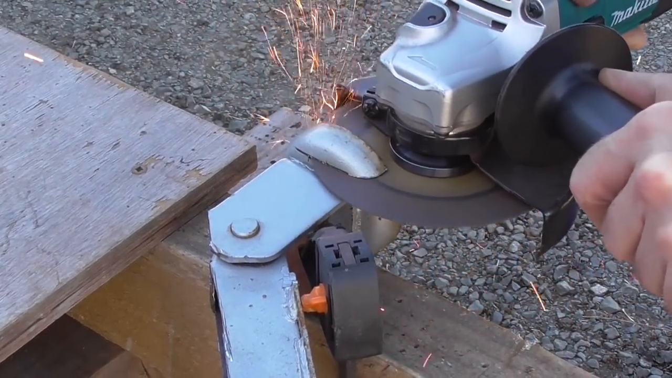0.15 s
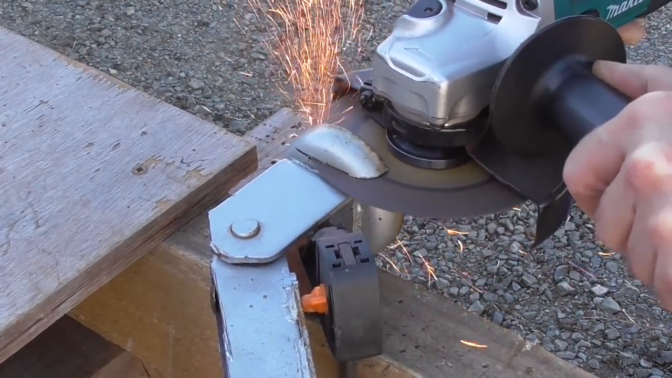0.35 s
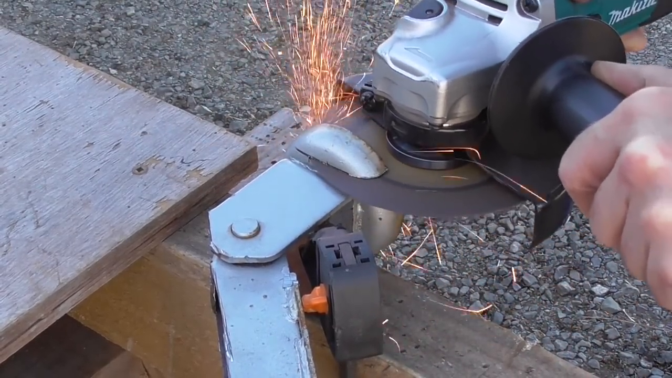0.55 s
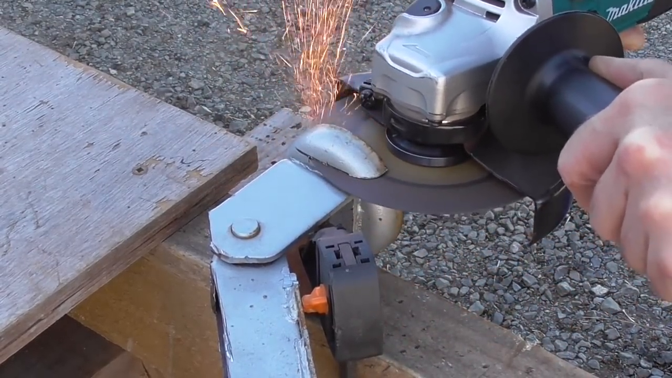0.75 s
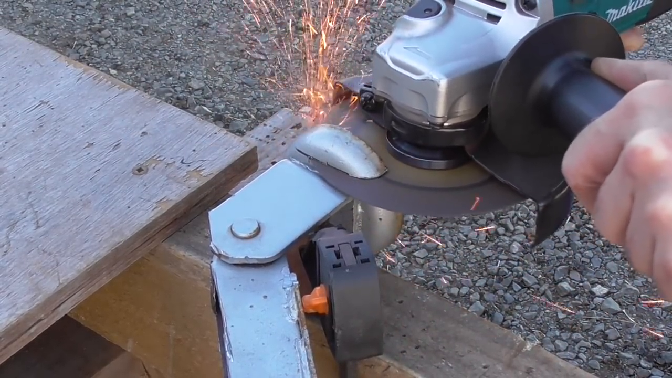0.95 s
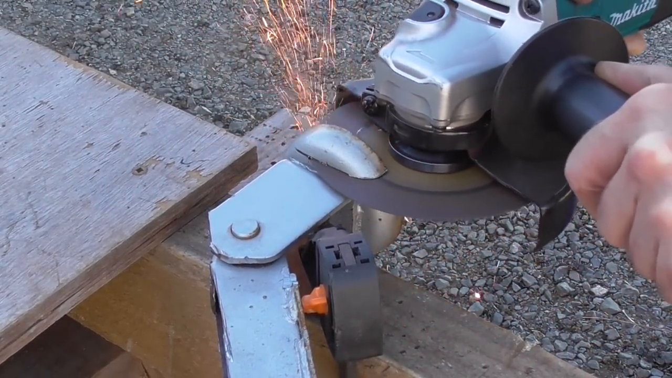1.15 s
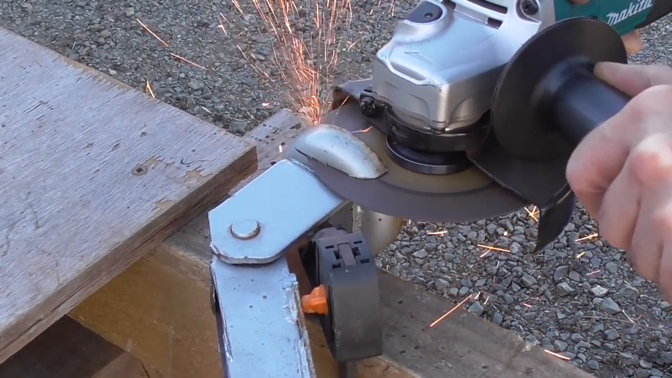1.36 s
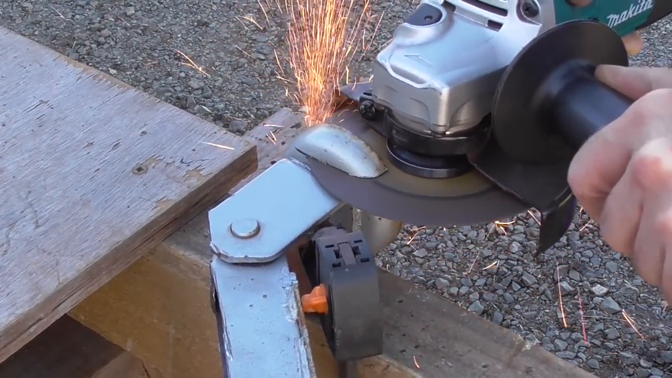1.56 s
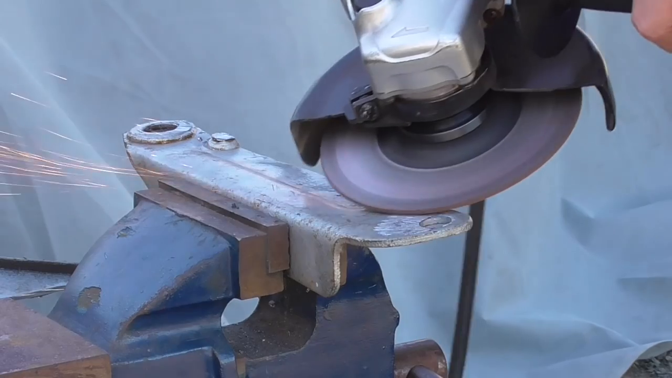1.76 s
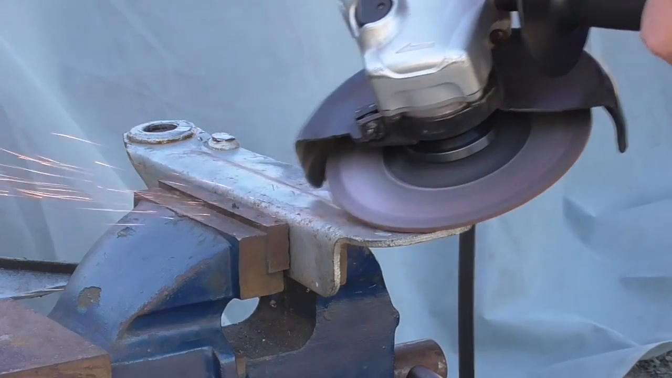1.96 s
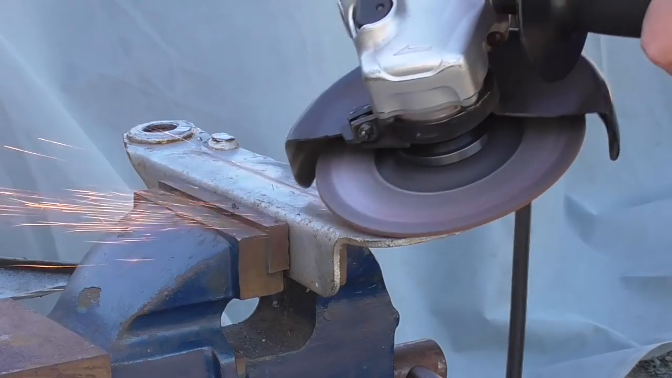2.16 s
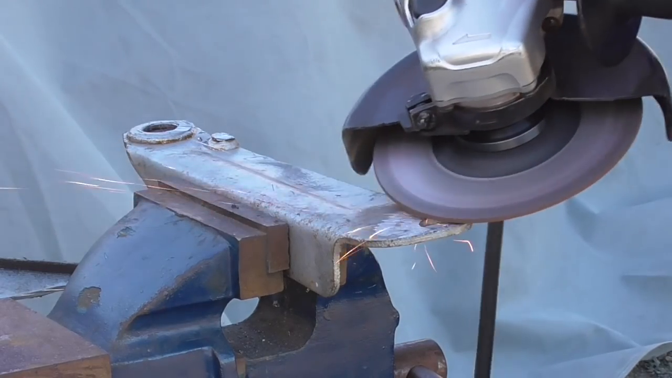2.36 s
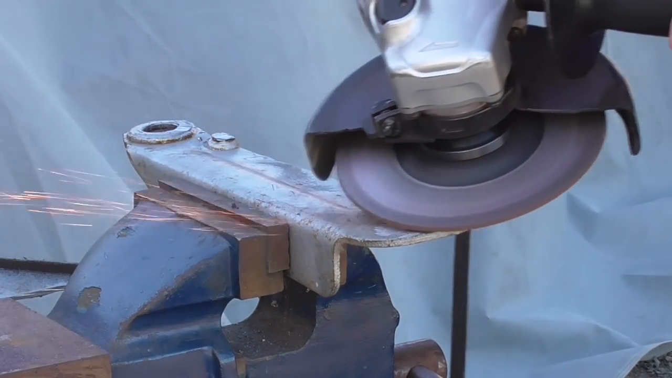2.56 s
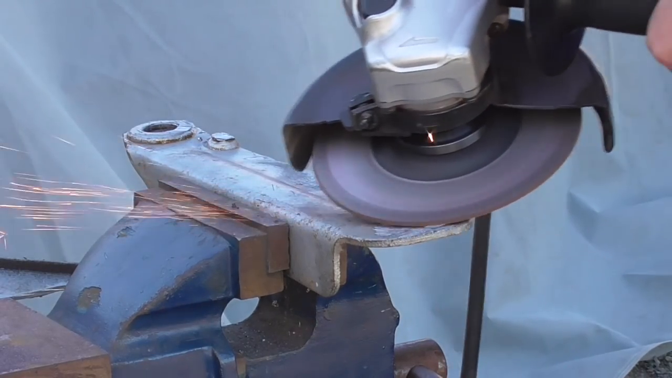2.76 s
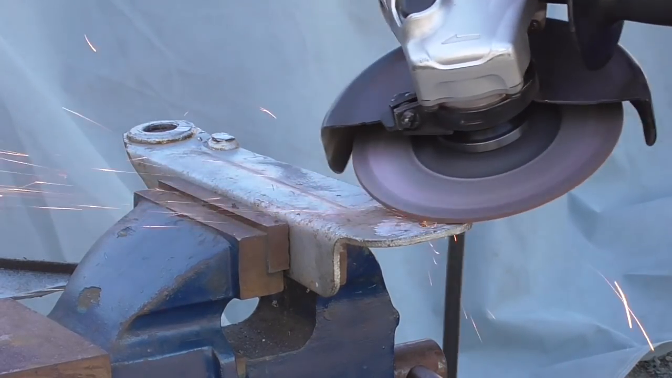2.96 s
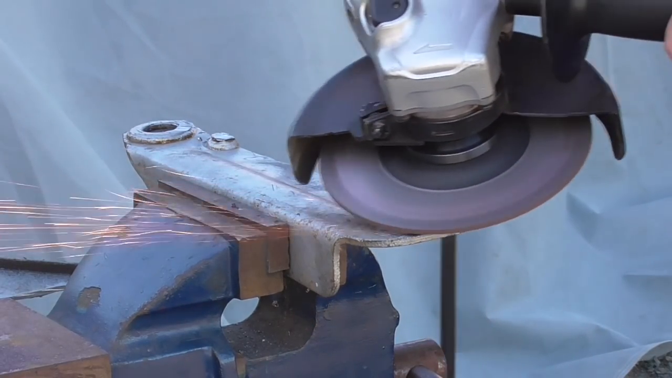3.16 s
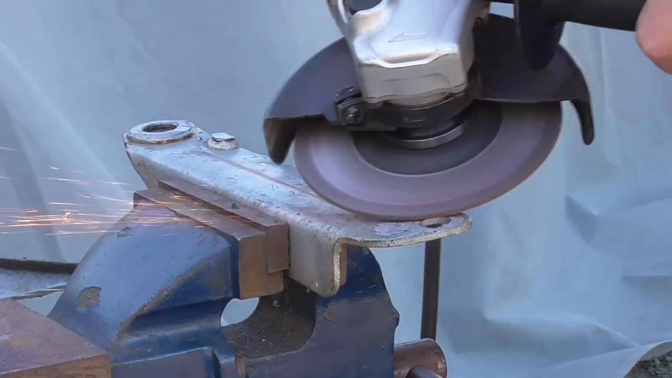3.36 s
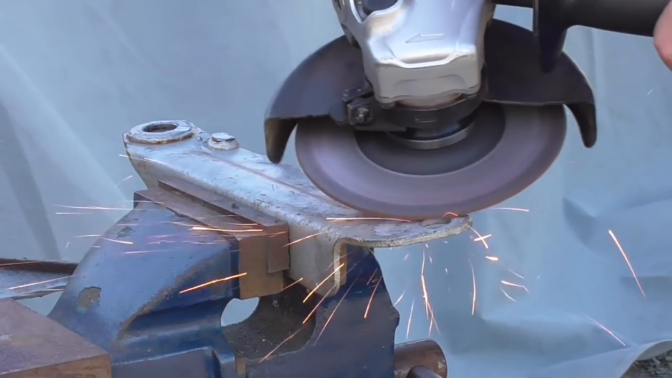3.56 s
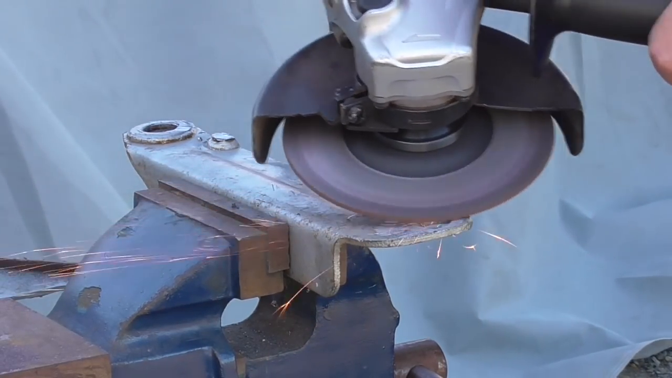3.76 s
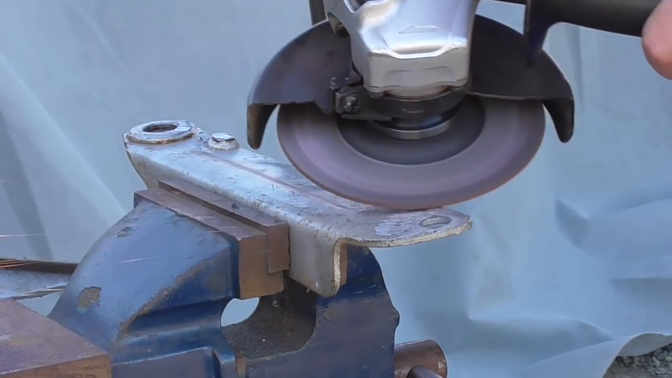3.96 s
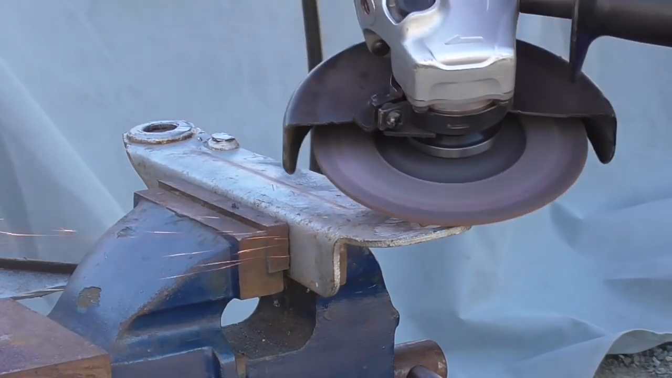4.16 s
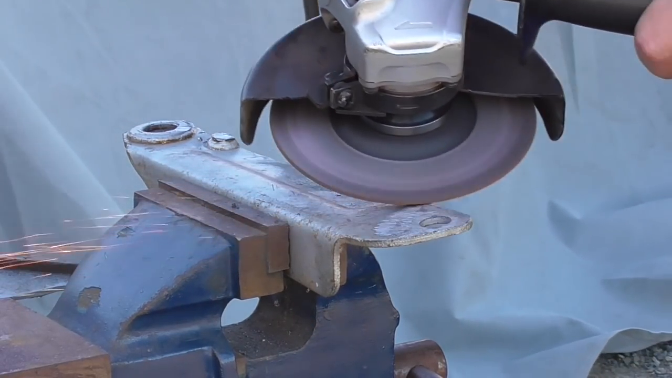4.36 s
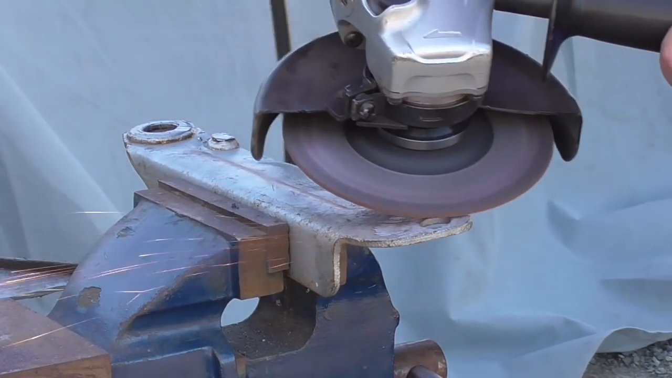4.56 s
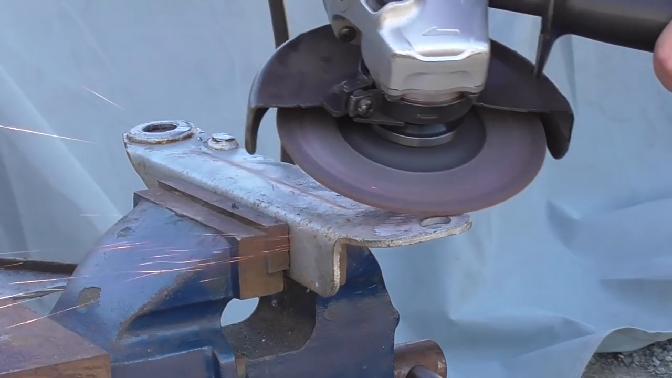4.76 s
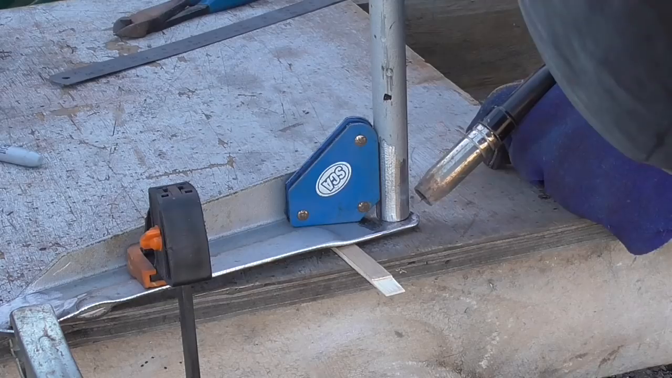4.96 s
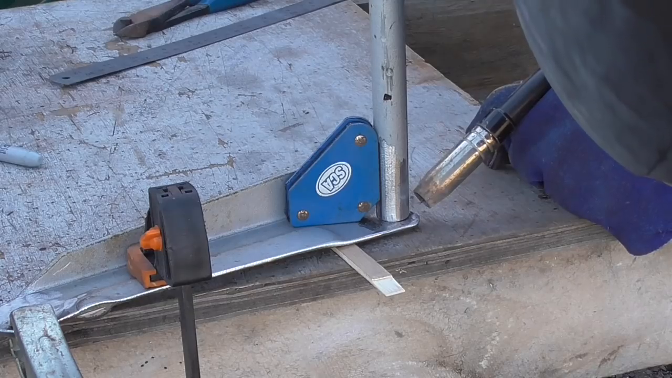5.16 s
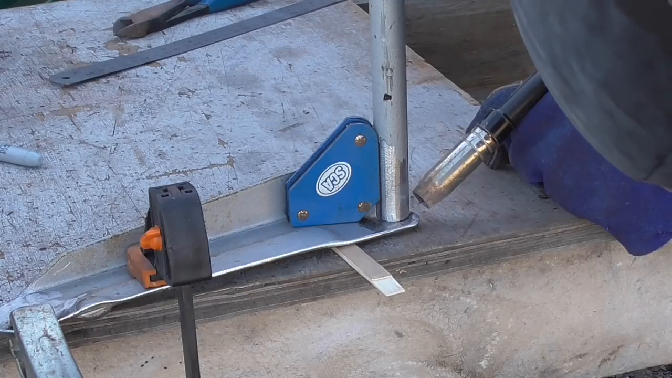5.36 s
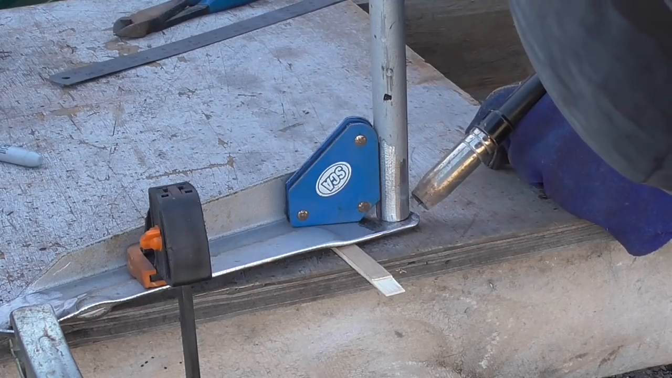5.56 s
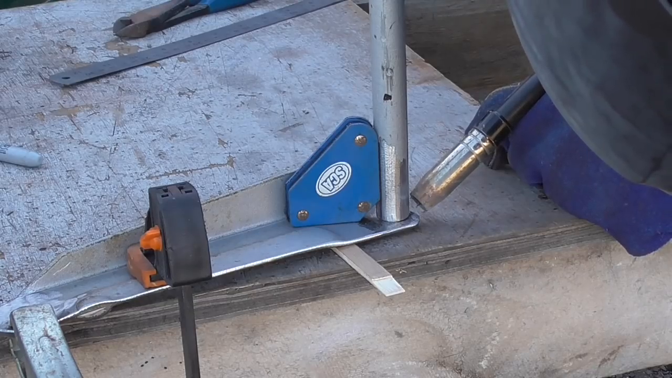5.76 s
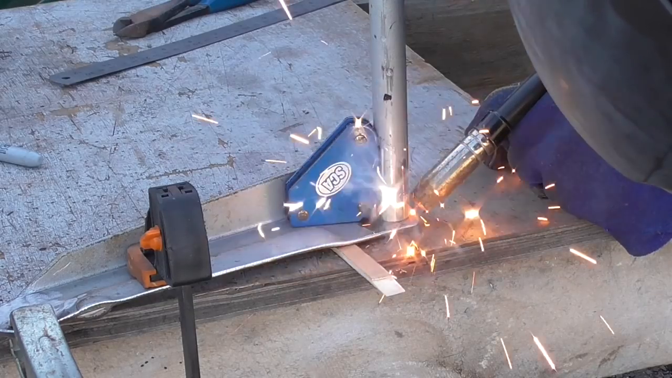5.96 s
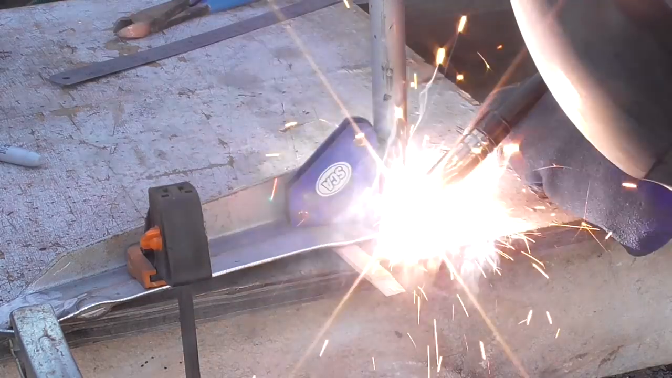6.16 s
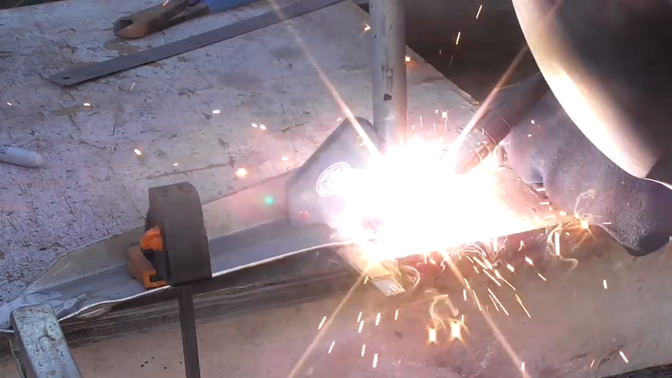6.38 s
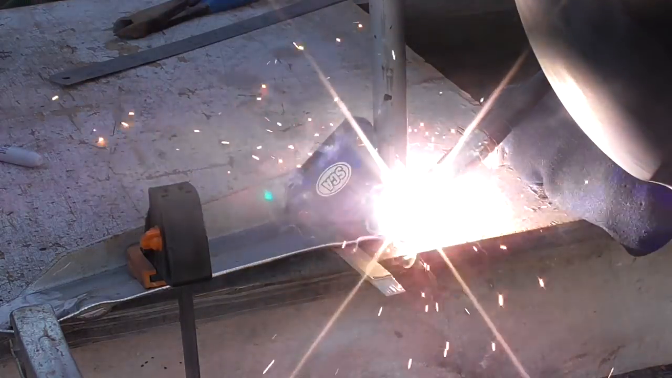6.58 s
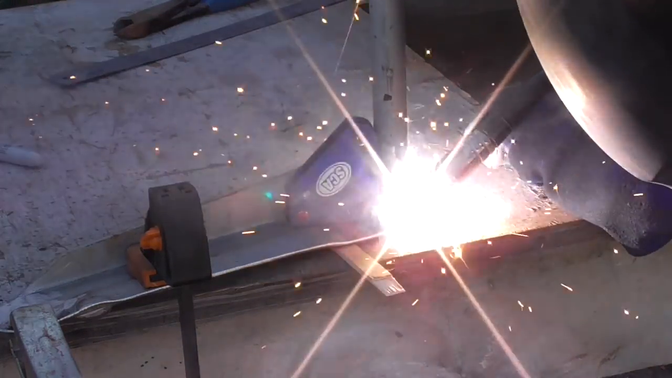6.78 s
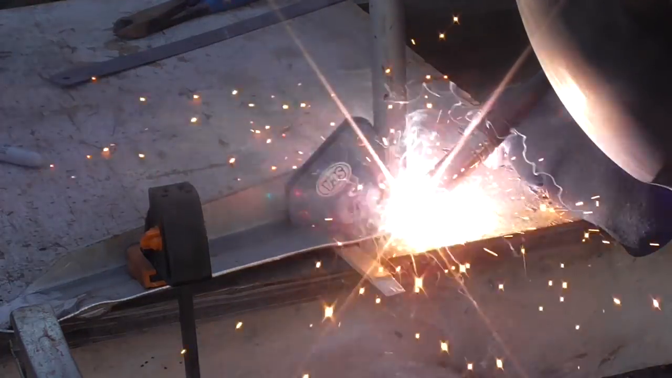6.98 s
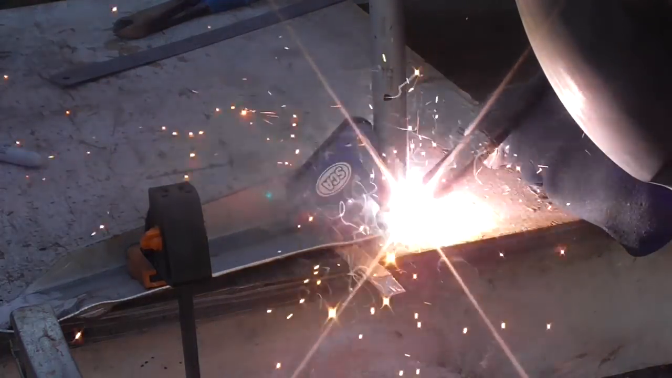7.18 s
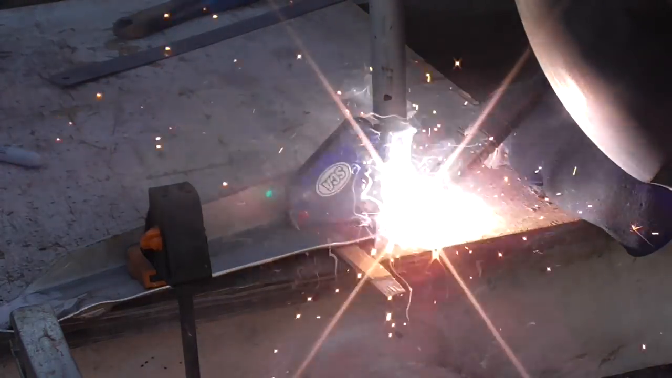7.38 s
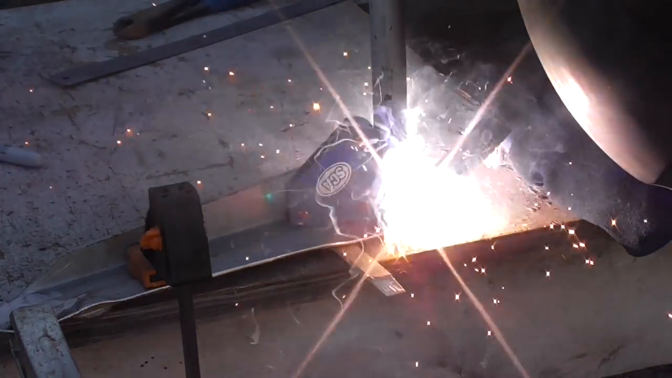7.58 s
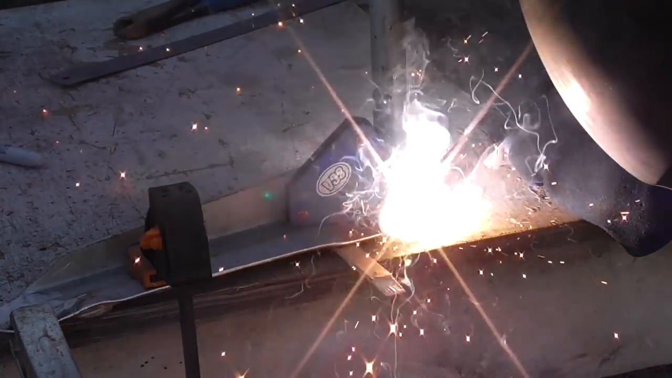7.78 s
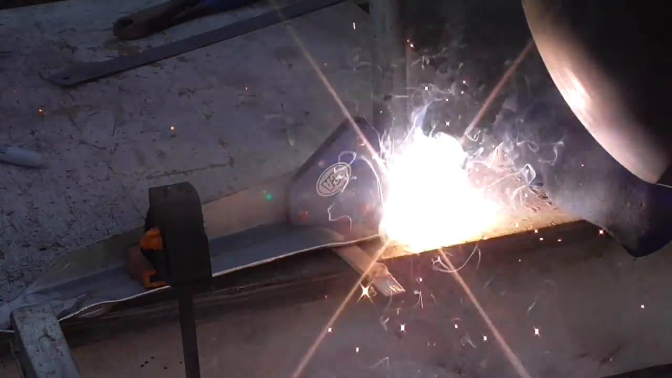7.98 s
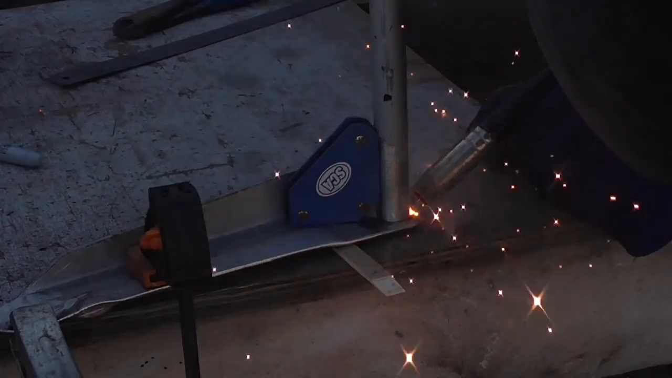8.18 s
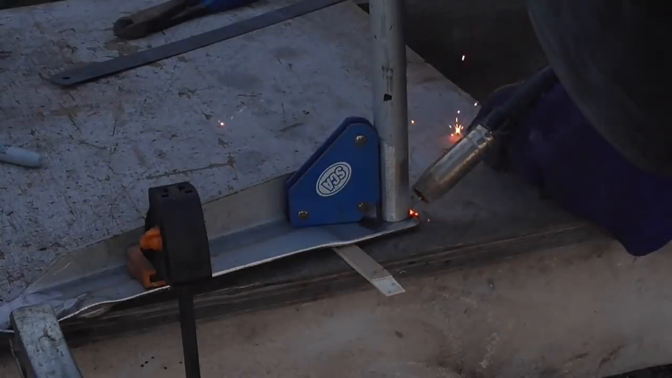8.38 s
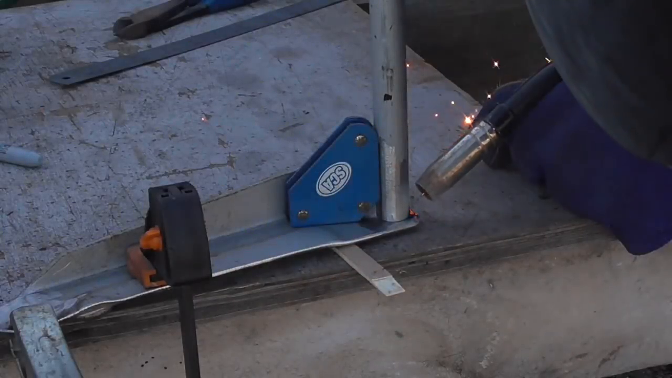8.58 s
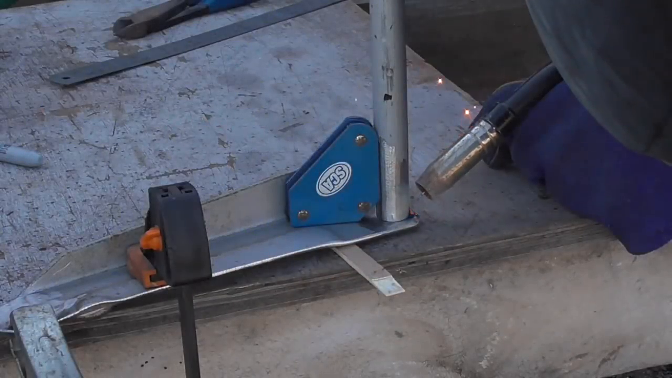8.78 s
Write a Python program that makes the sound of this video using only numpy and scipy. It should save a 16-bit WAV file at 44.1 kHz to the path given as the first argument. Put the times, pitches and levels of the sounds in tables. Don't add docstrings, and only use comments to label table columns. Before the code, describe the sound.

Stereo microphones near the work, outdoors and dry. First a steady, gritty cutting rasp surges as the disc bites. An abrupt jump brings rougher grinding that flutters and hops with each turn, setting off metallic squeals stroke after stroke. Another jump drops to quiet fan hum, low wind thumps and distant birds, then a contactor clunk, hard wire snaps and a buzzing, spitting weld. It breaks off and the yard hum slowly returns.

```python
import sys
import numpy as np
from scipy import signal
from scipy.fft import rfft, irfft
from scipy.io import wavfile
from scipy.ndimage import uniform_filter1d

SR = 44100
rng = np.random.default_rng(int(sys.argv[2]) if len(sys.argv) > 2 else 0)


def ratio(d):
    e = np.asarray(d, float) / 20
    return 10 ** e


def to_wav(s):
    ch = np.atleast_2d(s).T
    pcm = np.round(np.clip(ch, -1, 1) * 32767)
    wavfile.write(sys.argv[1], SR, pcm.astype(np.int16))


N = 389403
T = np.arange(N) / SR

SCENE_CHANGES = (1.65, 4.948)

# (time [s], shaft speed [Hz])
CUT_SHAFT = [(0.04, 126.7), (0.2, 123.6), (0.36, 131.8), (0.54, 126.6), (0.92, 133.6), (1.16, 126.6),
             (1.32, 130.8), (1.48, 126.5), (1.58, 123.5)]
# (time [s], length [s], whine boost [dB])
CUT_BITES = [
    (.15, 0.12, 9),
    (.38, 0.26, 8),
    (.65, 0.17, 9.5),
    (.9, 0.51, 4),
    (1.11, 0.23, 6),
    (1.33, 0.097, 11),
    (1.54, 0.25, 10),
]
# (frequency [Hz], level [dB per Hz])
CUT_RASP = [(88, -50), (150, -19), (432, -17), (615, -12), (928, -12.5), (1540, -5), (1770, -16),
            (2200, -12.5), (2470, -18.5), (2950, -10.5), (4530, 0), (5520, -6.5), (11200, -5.5),
            (15300, -17), (16200, -17)]
# (frequency [Hz], width [Hz], level [dB])
CUT_RINGS = [(4620, 64, -15), (8160, 340, -14), (8900, 130, -12), (9930, 60, -12), (10880, 45, -14)]
# (shaft multiple [1], level over the whine [dB])
CUT_WHINE = [(11, -10), (12, 0), (33, -9), (35, 0), (36, -3.5)]
# (time [s], length [s], level [dB])
BAR_SQUEAKS = [
    (.55, .1, -57),
    (1.07, .2, -58),
    (1.22, .08, -60),
    (1.42, .2, -58),
]

CALM_WIND = (-70, -91, -70)
# (time [s], length [s], level [dB])
GUSTS = [(0.035, 0.17, -66), (0.572, 0.52, -57), (1.106, 0.3, -64), (1.402, 0.36, -56), (1.897, 0.9, -73),
         (1.796, 0.16, -66), (2.255, 0.59, -65.5), (2.59, 0.73, -75), (3.097, 1.3, -73), (4.184, 0.11, -70),
         (4.33, 0.092, -68), (4.602, 0.73, -81), (4.98, .07, -43), (5.03, .16, -40), (5.222, 0.24, -40.5),
         (5.42, 0.35, -59), (5.69, 0.52, -42), (5.905, 0.34, -43), (6.376, 0.24, -48.5), (6.84, 0.4, -53),
         (6.66, .15, -56), (7.3, .6, -71), (7.746, 0.67, -65)]
# (frequency [Hz], level [dB per Hz])
WIND_COLOUR = [(12, -37), (20, -23), (59, -4.5), (129, 0), (187, -4.5), (245, -6.5), (386, -21), (600, -28),
               (780, -69), (1320, -120)]

# (time [s], shaft speed [Hz])
GRIND_SHAFT = [(1.75, 154.5), (2.05, 153.8), (2.35, 153.2), (2.5, 154.8), (3.25, 153.9), (3.7, 154.1),
               (3.85, 154.8), (4.3, 155.4), (4.8, 156.1)]
# (time [s], pressure [dB], hop [0-1])
PRESS = [
    (1.65, -34, 0.2),
    (1.69, -46, 0.5),
    (1.79, -35.5, 1),
    (2.3, -34, 0.73),
    (2.48, -34, 0.35),
    (3.4, -33, 0.58),
    (3.75, -33.5, 0.05),
    (4.3, -35.5, 0),
    (4.95, -34.5, 0),
]
# (time [s], length [s], change [dB])
LIFTS = [(2.83, 0.079, -6.5), (3.15, 0.055, -4), (3.5, .08, -3), (3.84, 0.088, -1.5), (4.02, 0.063, -2),
         (4.2, 0.081, 1), (4, 0.047, -6), (4.66, 0.072, -0.5), (2.63, 0.051, -6.5), (2.45, .04, -2),
         (1.657, .012, 1), (2, 0.027, -3)]
# (frequency [Hz], width [Hz], level [dB])
BRACKET_RINGS = [
    [(6448, 150, -0.5), (6407, 27, -15), (5500, 33, -17), (4200, 45, -13)],
    [(6370, 92, -17)],
    [(7410, 74, -6.5), (11050, 86, -14), (10300, 370, -8), (13000, 170, -16)],
    [(9100, 110, 4.5), (12100, 100, -5), (12900, 160, -13)],
    [(4200, 45, -3)],
    [(7080, 180, -1), (8100, 250, -3)],
    [(2320, 93, -6.5)],
    [(10050, 190, 3), (13050, 200, -16), (11050, 100, -13)],
]
# (frequency [Hz], level [dB])
BRACKET_SQUEALS = [
    [(6470, -8)],
    [(5233, -2)],
    [(7460, -1.5)],
    [(8945, 4.5)],
    [(4180, 5)],
    [(6955, -6)],
    [],
    [],
]
SQUEAL_THROB = [0.63, 0.18, 0.68, 0.25, 0.22, 0.56, .5, .5]
DRIVE_REST = [-0.5, -27, -13, -13, -17, -16, -30, -13]
# (time [s], length [s], lip boost [dB], edge boost [dB], hub boost [dB])
TIP_STROKES = [(1.8, .14, -3, -1, 7.5), (1.96, .16, 7, -12, 10), (2.13, 0.18, 0, 2.5, -1),
               (2.35, 0.25, 28.5, 1, 6.5), (2.68, 0.12, 23, 9.5, 9.5), (3.01, 0.14, 25, 9, 8.5),
               (3.28, .17, 30, 8, 11), (3.6, 0.18, 21, 3.5, 6), (3.95, 0.19, 12, 4, 7),
               (4.3, 0.14, 0, 10, 10.5), (4.83, 0.19, 0, 4, -1), (2.57, .09, 0, 8, 5), (2.9, .08, 0, -1, 7),
               (4.5, .14, 0, 0, 1), (3.36, 0.09, 2, 4.5, 0)]
# (time [s], length [s], web boost [dB], rim boost [dB])
VICE_STROKES = [(1.8, .12, 0, 5), (2.3, .15, 11, 12), (2.51, 0.23, 3, 14), (2.74, 0.18, 7, 15.5),
                (2.91, 0.089, 9, -2), (3.08, 0.23, 1, 14.5), (3.55, .3, 7, 6), (3.9, 0.4, 11, 8),
                (4.14, 0.25, 20, 9), (4.3, 0.16, 11.5, 3), (4.5, 0.41, 16.5, 4), (4.8, 0.25, 16, 8),
                (4.92, .12, 9, 0)]
# (time [s], length [s], face boost [dB])
FACE_STROKES = [(1.9, .2, 4), (2.25, .15, 4), (2.54, .16, 8), (2.71, .16, 7), (2.93, .1, 5), (3.1, .26, 8),
                (3.32, .22, 8), (3.6, .2, 5), (3.95, .16, 6), (4.16, .16, 7), (4.32, .1, 3), (4.5, .16, 6),
                (4.87, .24, 8)]
# (frequency [Hz], level [dB per Hz])
GRIND_AIR = [(88, -36), (150, -29), (260, -24), (390, -24), (520, -20), (860, -19), (980, -24), (1100, -16),
             (1350, -13.5), (1740, -19), (1990, -14), (2830, -16.5), (4190, -8), (4900, -10.5), (6450, -6),
             (6980, -8.5), (12300, -15.5), (15300, -29), (16200, -71)]
# (shaft multiple [1], level [dB])
MOTOR = [(1.0, -74), (2.0, -72), (3.0, -62), (4.0, -69), (7.5, -67), (12.0, -60)]
# (shaft multiple [1], level at rest [dB])
GEAR = [(13, -61), (16, -59)]
# (time [s], length [s], first tone boost [dB], second tone boost [dB])
GEAR_LOAD = [
    (2.95, .12, 8, 0),
    (3.15, .2, 5, 0),
    (3.95, .28, 8, 3),
    (3.8, .2, 0, 10),
    (4.13, .18, 0, 9),
    (4.5, .25, 0, 11),
    (4.64, 0.27, 14, 5),
    (4.8, .32, 0, 8),
    (4.92, .1, 13, 9),
]
# (time [s], length [s], level [dB])
EARLY_HUM = [
    (2.05, .9, -62),
]

# (frequency [Hz], level [dB])
FAN = [(223, -43), (447, -55.5)]
# (frequency [Hz], level [dB per Hz])
YARD_COLOUR = [(180, -32), (300, -7), (447, -3), (565, -2.5), (856, -5.5), (1410, -10), (1750, -23),
               (4020, -18), (6410, -26), (8360, -7), (9880, -24.5), (14700, -37), (16000, -50)]
# (time [s], length [s], start pitch [Hz], end pitch [Hz], level [dB])
BIRDS = [
    (5.07, 0.068, 4550, 4690, -53),
    (5.1, .04, 4500, 3950, -64),
    (5.44, 0.079, 4440, 3830, -52),
    (5.499, 0.069, 3880, 3620, -53),
    (8.43, 0.045, 4530, 3440, -51),
    (8.495, 0.026, 3560, 3830, -46),
    (8.53, 0.091, 3540, 3600, -54),
    (8.52, 0.058, 4150, 4123, -55),
]
# (time [s], gain [dB])
YARD_GAIN = [
    (4.95, 0.5),
    (5.85, 1),
    (5.96, 3),
    (6.0, -0.5),
    (6.2, -8.5),
    (8.2, -11.5),
    (8.27, -8.5),
    (8.5, -7),
    (8.83, -1),
]

# (time [s], rise [s], hold [s], T60 [s], frequency [Hz], level [dB])
CASE_BOOM = [
    (5.885, 0.013, 0.035, 0.037, 195, -23.5),
    (5.885, 0.03, .01, 0.26, 150, -32),
    (5.88, 0.0064, .002, 0.216, 480, -35),
]
# (time [s], rise [s], fall per 10 dB [s], sputter level [dB])
STRIKE = [
    (5.872, .008, .004, -49),
    (5.883, .003, .009, -34),
    (5.89, .005, 0.36, -49),
    (5.98, .0015, .004, -24),
    (6.021, 0.013, .02, -31),
    (6.034, 0.011, .009, -24.5),
    (6.076, .006, .004, -51),
    (6.1, 0.027, 0.5, -61),
    (6.164, .002, 0.06, -42),
]
# (time [s], sputter level [dB], 9.5-12 kHz glare over it [dB])
ARC = [
    (6.16, -49, -8),
    (6.172, -46, -6),
    (6.18, -33, -1),
    (6.31, -35, -2),
    (6.9, -35, 0.5),
    (7.3, -34.5, 1),
    (7.65, -37.5, -5),
    (8.0, -38.5, -3),
    (8.21, -33.5, -3),
    (8.26, -57, -2.5),
]
# (time [s], length [s], change [dB])
ARC_SURGES = [(6.43, 0.12, 3.5), (6.61, 0.032, 3.5), (6.65, 0.098, -4), (6.81, .08, 1.5),
              (6.86, 0.026, 1.5), (7.67, 0.034, -5.5), (7.8, 0.12, 4.5), (8.11, 0.07, 2), (6.472, .02, 7),
              (6.485, .014, -5), (6.295, .02, -3), (6.57, .02, -5), (6.855, .02, -5), (6.915, .02, -2),
              (6.93, .03, 4), (7.11, .014, -6), (7.135, .05, 2.5), (7.235, 0.016, -3), (7.215, .03, -3.5),
              (7.455, .018, -5), (7.93, 0.055, -2)]
# (frequency [Hz], level [dB per Hz])
ARC_COLOUR = [(120, -36.5), (200, -8.5), (715, -9), (1220, -6.5), (1700, -14.5), (2090, -9), (2650, -13.5),
              (2850, -18), (3150, -8.5), (4450, -1), (6310, -11.5), (8150, -2), (9480, -5), (10600, -0.5),
              (12500, -22), (15000, -19), (16500, -32)]
# (frequency [Hz], level [dB])
COLD_WIRE_COLOUR = [(1500, 0), (3200, 5), (5000, 2.5), (6300, 3), (8500, -4), (11000, -2), (13500, 1.5)]
# (time [s], peak level [dB])
TICKS = [
    (5.8812, -26),
    (6.1248, -39),
    (6.1729, -2),
    (8.2966, -24),
    (8.3776, -31),
    (8.4165, -38),
    (8.69, -40),
]
# (time [s], peak level [dB])
WIRE_TOUCHES = [
    (5.9753, -1.5),
    (5.9793, -18),
    (6.0156, -14),
    (6.0214, -8),
    (6.026, -9),
    (6.033, -8),
    (6.0361, -14),
    (6.041, -13),
    (6.0601, -8),
]
# (time [s], peak level [dB])
EARLY_POPS = [(6.1628, -20), (6.1735, 0.5), (6.1768, -9), (6.1949, -2), (6.2351, -7), (6.256, -2.5),
              (6.2624, -11), (6.2739, -10), (6.3073, -8.5), (6.314, -13), (6.3367, -9), (6.3418, -13),
              (6.3526, -6.5), (6.3665, -11), (6.3742, -11), (6.3957, -4.5), (6.4112, -9), (6.4178, -8),
              (6.425, -7), (6.435, -6), (6.4455, -11), (6.4642, -7.5), (6.4682, -8), (6.4729, -6),
              (6.4948, -13), (6.4986, -10), (6.5333, -12), (6.545, -7), (6.5547, -10), (6.5796, -10),
              (6.613, -9), (6.6195, -7), (6.6351, -17), (6.6563, -12), (6.665, -15), (6.6945, -8.5),
              (6.715, -10), (6.744, -17), (6.7748, -12), (6.7915, -9), (6.8251, -6), (6.8352, -4.5),
              (6.8656, -6), (6.8735, -8), (6.9026, -8), (6.9267, -10), (6.936, -7), (6.9565, -9),
              (6.9741, -6.5), (6.9853, -11), (7.0536, -8), (7.0639, -7), (7.084, -6), (7.093, -12),
              (7.1161, -8), (7.1417, -8), (7.1456, -11), (7.1715, -13), (7.1775, -15), (7.1866, -13)]
# (time [s], peak level [dB])
LATE_POPS = [(7.2249, -7), (7.2447, -6), (7.2605, -14), (7.2728, -15), (7.2759, -9.5), (7.2847, -15),
             (7.2909, -14), (7.306, -10), (7.3147, -14), (7.3342, -8), (7.3443, -8.5), (7.3547, -11),
             (7.3661, -11), (7.3757, -10), (7.3944, -11), (7.3999, -10), (7.4145, -13), (7.4447, -14),
             (7.4638, -4.5), (7.4755, -13), (7.4835, -16), (7.4943, -10), (7.5253, -7), (7.5444, -13),
             (7.5513, -9), (7.564, -8), (7.5765, -12), (7.5944, -10), (7.6052, -6.5), (7.6255, -8),
             (7.643, -14), (7.6848, -8.5), (7.701, -14), (7.7152, -11), (7.725, -7), (7.7463, -16),
             (7.7544, -13), (7.7644, -7), (7.7746, -14), (7.7866, -13), (7.7947, -9), (7.8056, -6),
             (7.8245, -11), (7.856, -14), (7.873, -15), (7.8939, -10.5), (7.9416, -16), (7.9532, -14),
             (7.973, -14), (7.9944, -11), (8.045, -13), (8.0744, -14), (8.0957, -13), (8.1052, -7),
             (8.115, -10), (8.125, -7), (8.1323, -13), (8.1645, -11), (8.1844, -8), (8.2035, -3.5)]
# (frequency [Hz], level [dB per Hz])
FEED_COLOUR = [(150, -17), (300, 0.5), (600, -7), (1500, -14), (3200, -18), (5000, -31)]

# (frequency [Hz], width [Hz])
GROUND_NOTCHES = [
    (2520, 100),
    (1727, 86),
]
# (frequency [Hz], side minus mid [dB])
SIDE_COLOUR = [(60, 2), (110, -7), (200, -27), (380, -8), (700, -8), (1290, -6.5), (2380, -10.5),
               (4400, -8), (8120, -12.5), (15000, -8)]


def level(x, db):
    return x * ratio(db) / np.sqrt(np.mean(x ** 2))


def noise():
    return rng.standard_normal(N)


def curves(table):
    s, *columns = np.transpose(table)
    return [np.interp(T, s, c) for c in columns]


def swells(table):
    out = np.zeros((len(table[0]) - 2, N))
    for s, length, *sizes in table:
        span = slice(max(int((s - length / 2) * SR), 0), int((s + length / 2) * SR))
        hump = 1.34 * np.cos(np.pi * (T[span] - s) / length) ** 2
        out[:, span] += np.outer(sizes, np.minimum(hump, 1))
    return out


def loudness_swells(table, trim_db=0):
    return swells([(s, length, ratio(db + trim_db)) for s, length, db in table])[0]


def between(t0, t1):
    return np.clip(np.minimum(T - t0, t1 - T) / .001, 0, 1)


def walk(rate):
    k = int(SR / rate)
    held = np.repeat(rng.standard_normal(N // k + 1), k)
    return 1.02 * uniform_filter1d(uniform_filter1d(held, k), k)[:N]


def sine(turns, phase=0):
    return np.sin(2 * np.pi * turns + phase)


def butter(x, hz, kind, order=4):
    return signal.sosfilt(signal.butter(order, hz, kind, fs=SR, output="sos"), x)


def colour(x, points):
    hz, db = np.transpose(points)
    bins_hz = np.arange(1025) * SR / 2048
    cep = irfft(np.interp(np.log(bins_hz + 1), np.log(hz), db) * np.log(10) / 20)
    cep[1:1024] *= 2
    cep[1025:] = 0
    return signal.oaconvolve(x, irfft(np.exp(rfft(cep))))[:N]


def ring(x, hz, width):
    return level(signal.lfilter(*signal.iirpeak(hz, hz / width, fs=SR), x), 0)


def grit(turns, same, throb, skip_db):
    rims = rng.standard_normal((200, 300))
    place = (turns % 1 * 300).astype(int)
    wear = turns / 14
    worn = wear.astype(int)
    fade = np.pi / 2 * (wear % 1)
    rim = np.cos(fade) * rims[worn, place] + np.sin(fade) * rims[worn + 1, place]
    bite = ratio(skip_db * np.clip(rng.standard_normal(2000), -2, 1.6))[turns.astype(int)]
    rough = same * rim + np.sqrt(1 - same ** 2) * noise()
    return rough * (1 + bite * throb * (1 - np.cos(2 * np.pi * turns)))


def cutting():
    bite_db = swells(CUT_BITES)[0]
    rasp_db, whine_db = -35 + 0.12 * bite_db, -58.5 + bite_db
    turns = np.cumsum(curves(CUT_SHAFT)[0] * (1 + .002 * walk(9))) / SR
    contact = grit(turns, same=0.74, throb=0.12, skip_db=4.5)
    contact = contact * (1 + 0.045 * np.cos(4 * np.pi * turns))

    bright = butter(level(contact, 0), 1200, "high")
    draught = butter(noise(), 1200, "low")
    rasp = level(colour(bright + draught, CUT_RASP), 0)
    for hz, width, db in CUT_RINGS:
        rasp = rasp + level(ring(contact, hz, width) * ratio(4.2 * walk(6.44)), db)
    rasp = level(rasp, 0) * ratio(rasp_db + 1.3 * walk(25.05))

    whine = sum(ratio(db + 4.1 * walk(11.9)) * sine(k * turns, 0.96 * walk(50.1)) for k, db in CUT_WHINE)
    squeak = loudness_swells(BAR_SQUEAKS, 2.5) * sine(2290 * T, 2.5 * walk(30))
    return rasp + whine * ratio(whine_db) + squeak


def wind():
    gust = ratio(CALM_WIND)[np.searchsorted(SCENE_CHANGES, T)] + loudness_swells(GUSTS)

    def rumble(db):
        flurry = ratio(3.9 * np.clip(walk(25), -3, 1.3))
        return level(colour(noise() * flurry, WIND_COLOUR), db)

    mid, side = rumble(-1), rumble(9)
    pan = ratio(np.array([[0.8], [-0.8]]))
    return gust * (mid + side * np.array([[1], [-1]])) * pan


def bracket_steel(contact, turns, drives, boosts):
    swing = np.cos(2 * np.pi * turns)
    lock = ratio(-4 + 0.35 * np.minimum(boosts, 15))
    steel = 0
    for drive, locking, rung, locked, throb in zip(drives, lock, BRACKET_RINGS, BRACKET_SQUEALS, SQUEAL_THROB):
        rings = sum(ratio(db) * ring(contact, hz, width) for hz, width, db in rung)
        rings = rings * ratio(1.6 * walk(9.9)) * (1 + 0.65 * swing)
        squeal = sum(ratio(db + 2.2 * walk(13)) * sine(hz * T, 1.8 * walk(35)) for hz, db in locked)
        steel = steel + drive * (rings + locking * squeal * (1 + throb * swing))
    return steel * ratio(0.65 * walk(160))


def grinder_motor(turns):
    motor = 0
    for k, db in MOTOR:
        fade_db = 1.2 * (k == 3) * (T - 2)
        motor = motor + ratio(db + 3.2 * walk(11) - fade_db) * sine(k * turns, 0.52 * walk(40))
    for (k, db), load_db in zip(GEAR, swells(GEAR_LOAD)):
        motor = motor + ratio(db + load_db + 2.5 * walk(11)) * sine(k * turns, 0.66 * walk(40))
    return motor


def grinding():
    turns = np.cumsum(curves(GRIND_SHAFT)[0]) / SR
    press_db, hop = curves(PRESS)
    lip, edge, hub = swells(TIP_STROKES)
    web, rim = swells(VICE_STROKES)
    face = swells(FACE_STROKES)[0]
    flange = 0.17 * hub
    low_mode = 5.5 * (T - SCENE_CHANGES[0])
    boosts = np.array([flange, lip, web, edge, hub, rim, low_mode, face])
    drives = ratio(press_db + swells(LIFTS)[0] + np.array(DRIVE_REST)[:, None] + boosts)

    skip = ratio(6.9 * hop * np.clip(1 - lip / 30, 0, 1) * np.cos(np.pi * turns + 1.1 * walk(20)))
    contact = grit(turns, same=0.76, throb=0.9, skip_db=2.5)
    steel = bracket_steel(contact, turns, drives, boosts)

    half_turn_on = np.roll(level(contact, 0), int(SR / 310))
    bright = butter(half_turn_on, 1300, "high")
    draught = butter(noise(), 1300, "low")
    scrape = level(colour(bright + 0.84 * draught, GRIND_AIR), -6) * drives[0]
    air = level(colour(noise(), GRIND_AIR), -40) * ratio(1.4 * walk(12))
    early_hum = loudness_swells(EARLY_HUM) * sine(FAN[0][0] * T, walk(9))
    return (ratio(-3) * steel + scrape) * skip + air + grinder_motor(turns) + early_hum


def yard():
    out = sum(ratio(db + 0.34 * walk(21)) * sine(hz * T, .5 * walk(6.7)) for hz, db in FAN)
    out = out + ratio(-48) * ring(noise(), 195, 65)
    out = out + level(colour(noise(), YARD_COLOUR), -46.5) * ratio(0.48 * walk(11))
    blur = .4 + 1.1 * walk(500)
    for s, length, hz0, hz1, db in BIRDS:
        u = np.clip((T - s) / length, 0, 1)
        chirp = sine(np.cumsum(hz0 + (hz1 - hz0) * u) / SR)
        out = out + ratio(db - 1.5) * blur * np.sin(np.pi * u) * chirp
    return out * ratio(curves(YARD_GAIN)[0])


MAINS_HZ = 100.0


def case_boom():
    boom = 0
    for s, rise, hold, t60, hz, db in CASE_BOOM:
        u = np.maximum(T - s, 0)
        decay = ratio(db - 60 * np.maximum(u - rise - hold, 0) / t60)
        boom = boom + decay * np.minimum(u / rise, 1) ** 2 * sine(hz * u)
    return boom


def arc_spit(arc_db):
    flares = sum(ratio(db - 10 * np.maximum((s - T) / rise, (T - s) / fall)) for s, rise, fall, db in STRIKE)
    mains = 2 * np.pi * (MAINS_HZ * T - .63) + .5 * walk(70)
    beat = np.exp(0.5 * (T > 6.17) * (np.cos(mains) + 0.16 * np.sin(2 * mains)))
    sparks = (rng.random(N) < 700 / SR) * np.clip(noise(), -2.2, 2.2) ** 2
    spit = level(noise(), -5) + level(sparks - sparks.mean(), -8)
    spit = level(spit * beat * ratio(2.3 * walk(120)), 0)
    return spit * (ratio(arc_db + swells(ARC_SURGES)[0]) + flares)


def short_circuits():
    waves = (np.arange(618, 820) + .5) / MAINS_HZ
    odds = rng.random(len(waves))
    late, size = rng.standard_normal((2, len(waves)))
    short_db = -26 + 3 * np.minimum(size, .8) - 200 * np.maximum(odds - .45, 0)
    shorts = np.transpose([waves + .0012 * late, short_db])
    pops = [*shorts, *TICKS, *WIRE_TOUCHES, *EARLY_POPS, *LATE_POPS]
    t = np.arange(400) / SR
    fizz_decay = 0.09 * np.exp(-t / 0.0008) + .055 * np.exp(-t / .0032)
    snap = np.zeros(N)
    for s, db in pops:
        i = int((s + .0015) * SR)
        burst = rng.standard_normal(400) * fizz_decay
        burst[:3] += (1, -.9, -.1)
        snap[i:i + 400] += ratio(db) * burst
    return snap


def welder():
    arc_db, glare_db = curves([(6.15, -90, -4), *ARC, (8.3, -75, 0)])
    spit, snap = arc_spit(arc_db), short_circuits()
    glare = butter(spit + 0.45 * snap, [9700, 11800], "band", order=2) * ratio(glare_db)
    crack = butter(snap, 11500, "high")
    unit = np.std(colour(noise(), ARC_COLOUR))
    arc = colour(ratio(2) * spit + ratio(2.8) * snap, ARC_COLOUR) / unit
    arc = arc + ratio(-1.5) * crack + ratio(8) * glare
    arc = np.where(T < 6.1, colour(arc, COLD_WIRE_COLOUR), arc)
    feed = level(colour(noise(), FEED_COLOUR), -41.5) * between(5.885, 6.05)
    return arc + case_boom() + feed


def scene():
    a, b = SCENE_CHANGES
    cut, grind = (signal.lfilter(*signal.iirnotch(hz, hz / width, fs=SR), x)
                  for x, (hz, width) in zip((cutting(), grinding()), GROUND_NOTCHES))
    mid = cut * between(-1, a) + grind * between(a, b) + (welder() + yard()) * between(b, 10)
    scatter = rng.standard_normal(6000) * np.exp(-np.arange(6000) / SR / 0.016)
    reflected = signal.oaconvolve(mid, scatter / np.linalg.norm(scatter))[:N]
    side = colour(reflected, SIDE_COLOUR) - 0.035 * mid - 0.14 * np.diff(mid, prepend=0)
    return mid + ratio(-3) * side * np.array([[1], [-1]]) + wind()


def top_cut(x):
    return signal.sosfilt(signal.butter(12, 16640, fs=SR, output="sos"), x)


def record(dry):
    rounded = .62 * np.tanh(dry / .62)
    mix = signal.sosfilt(signal.ellip(8, .2, 40, 15650, fs=SR, output="sos"), rounded)
    return top_cut(mix)


dry = scene()
out = record(dry)
to_wav(out)
```